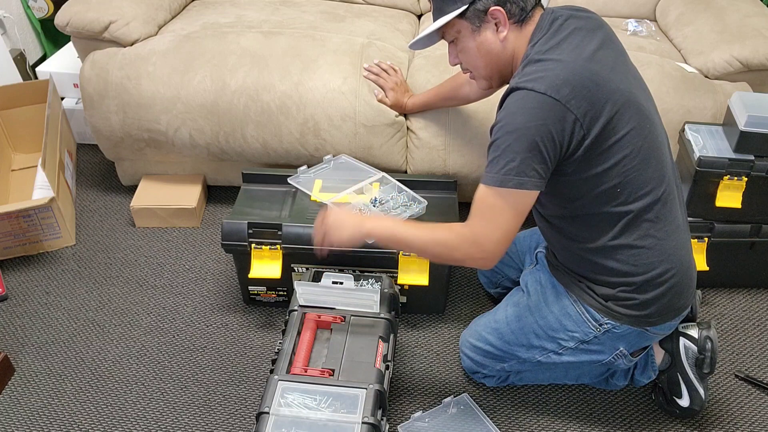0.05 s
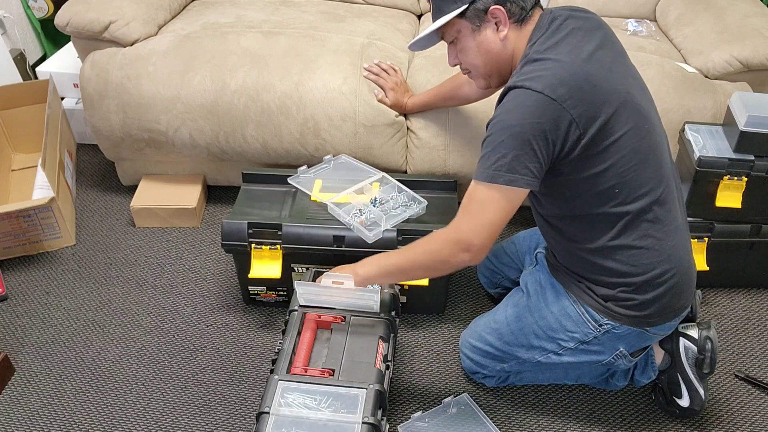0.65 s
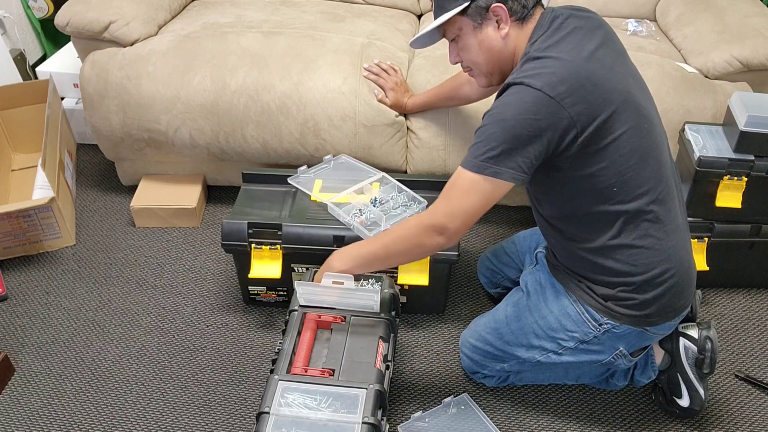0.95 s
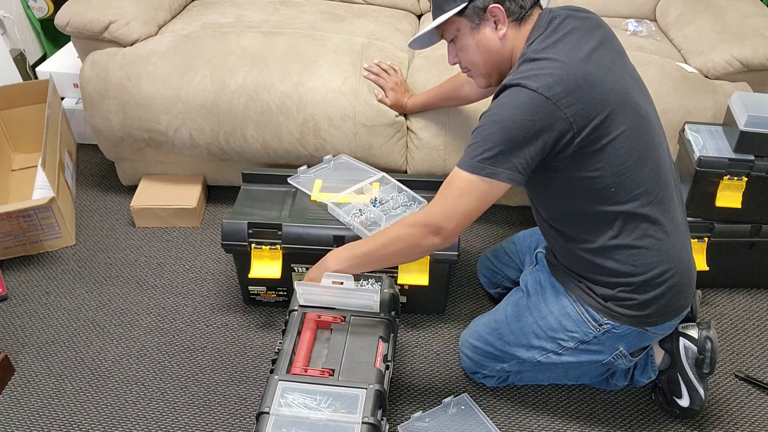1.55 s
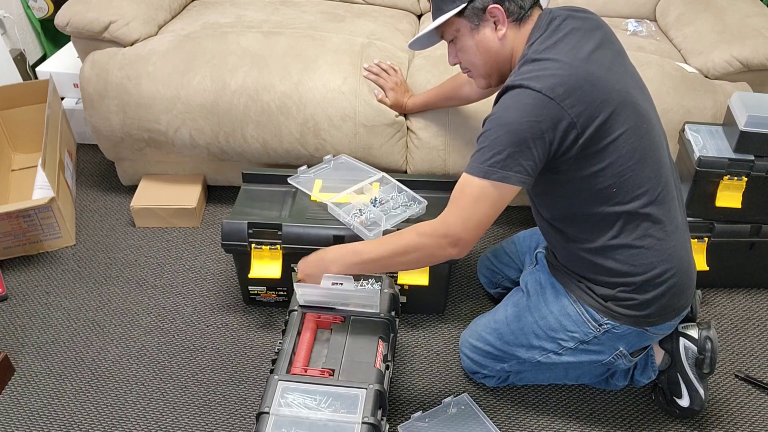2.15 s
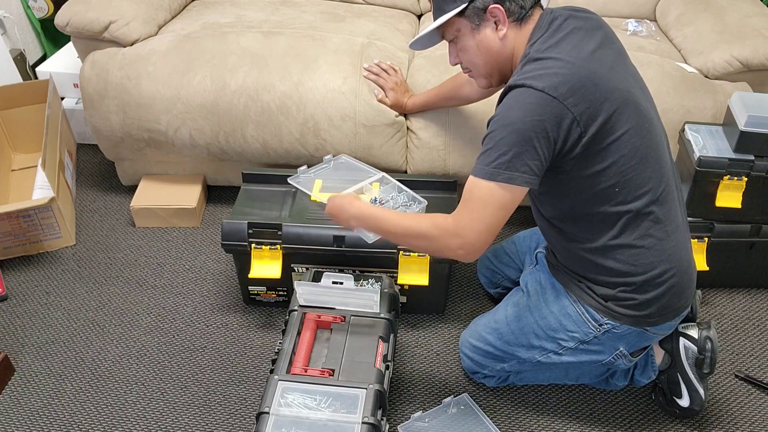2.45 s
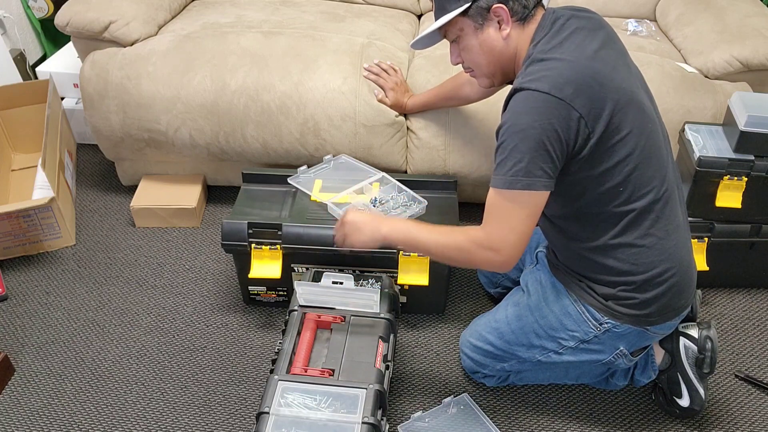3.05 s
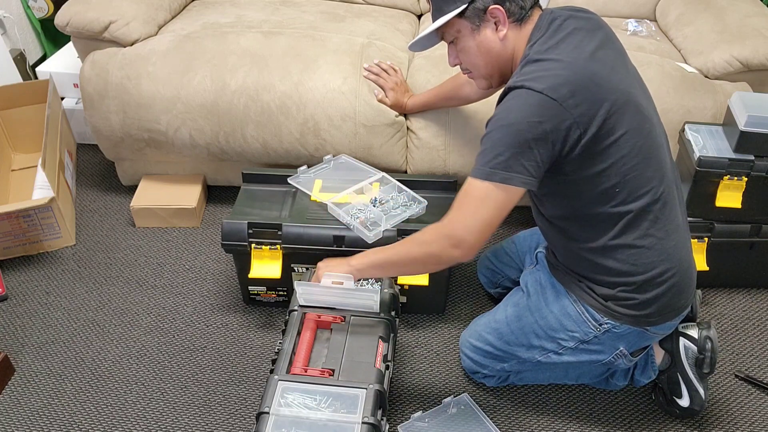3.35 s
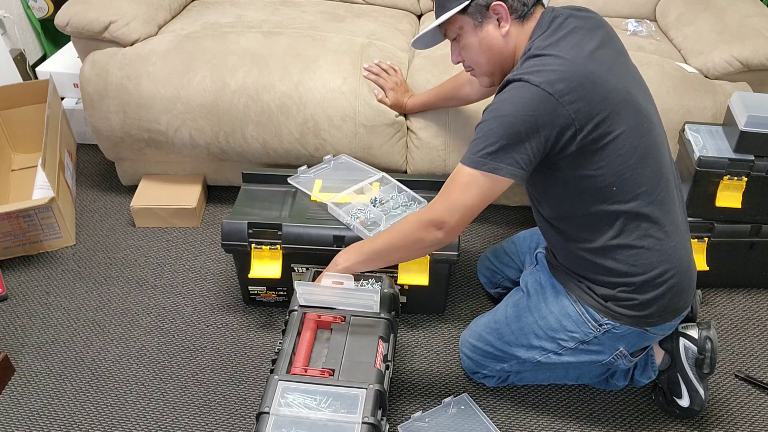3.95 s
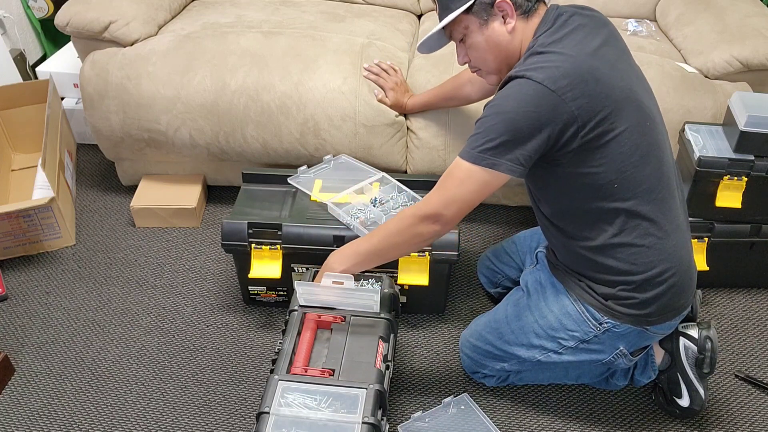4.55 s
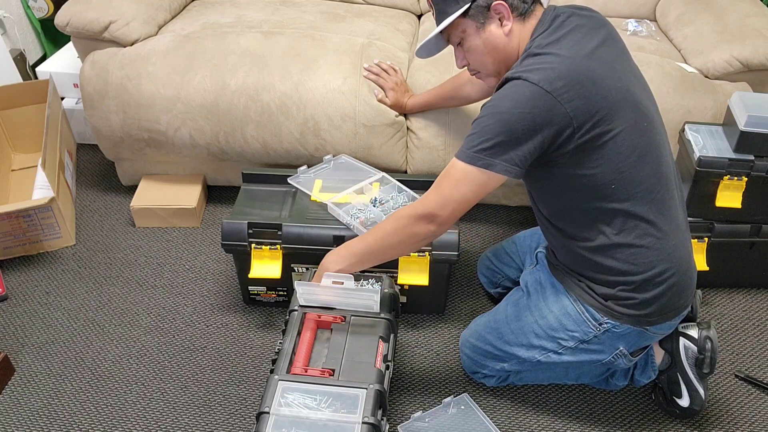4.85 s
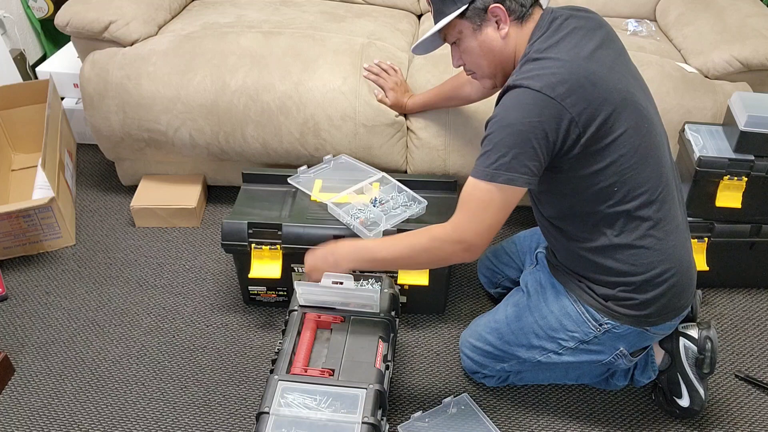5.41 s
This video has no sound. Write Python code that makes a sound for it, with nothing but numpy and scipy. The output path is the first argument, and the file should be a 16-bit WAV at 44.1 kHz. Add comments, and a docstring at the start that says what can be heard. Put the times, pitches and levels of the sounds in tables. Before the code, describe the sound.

A faint clink of screws in a hand opens over quiet room noise and a low hum. From about 0.5 seconds, fingers dig through small steel screws in a plastic bin: a dense, uneven rattle with sharp clicks and dull bumps against a toolbox, strongest around 0.8 and again from 1.7 to 2.1 seconds. After a short pause, at 2.7 seconds a handful pours into a plastic organizer with a brighter jingle, thinning to a trickle, and the last screw rolls lightly to rest by 3.4 seconds. Digging resumes at 3.7 seconds with heavier, hollow plastic knocks until about 4.3, eases into lighter stirring, and ends with a cluster of clicks around 5.2 to 5.3 seconds. A few very soft, deep floor bumps come from someone shifting their weight. The room is carpeted and fairly dry, with very little echo.

```python
"""Scooping and pouring small screws

In a carpeted room, a hand scoops steel screws from a plastic bin on a toolbox, pours one handful
into a compartment organizer, then digs for the next. Every contact rings the plastic floor, the
walls and the screws themselves. A dense rattle fills the gaps between the louder knocks."""
import sys
import numpy as np
from scipy import signal
from scipy.fft import rfft, irfft
from scipy.io import wavfile
from scipy.ndimage import uniform_filter1d, minimum_filter1d

SR = 44100
rng = np.random.default_rng(int(sys.argv[2]) if len(sys.argv) > 2 else 0)


def persist_wave(psi):
    """Save psi, clipped to +-1, as 16-bit WAV."""
    counts = np.round(np.clip(psi, -1, 1) * 32767).astype(np.int16)
    wavfile.write(sys.argv[1], SR, np.atleast_2d(counts).T)


N = 246078
RING_SAMPLES, ATTACK_SAMPLES, BOUNCE_SAMPLES = 1300, 220, 160

# spectrum of the room's noise: f/Hz, relative level/dB
ROOM_NOISE = [(25, -7), (45, 0), (110, -4.5), (200, -15.5), (450, -28.5), (800, -15.5), (1500, -22),
              (2500, -39), (6000, -39.5), (15000, -48.5)]
# mains hum and a thin whine: f/Hz, rms level/dB
HUM_TONES = [(59.2, -58.5), (118, -68), (4000, -82), (4802, -85.5)]
# the floor answers as a kneeling body shifts its weight: t/s, level/dB
BODY_SHIFTS = [(0.21, -50.5), (0.35, -53.5), (1.15, -49.5), (2.57, -54), (3.061, -48), (3.52, -51.5)]

# Modes are the tones an object rings with; t60 is the time they take to fade by 60 dB.
# toolbox shell, plastic bin and plastic organizer: f/Hz, relative level/dB, t60/s
TOOLBOX_MODES = [(175, -22.5, 0.026), (280, 0.5, .05), (322, 5, 0.065), (455, 2.5, 0.048)]
BIN_MODES = [(694.6, -5, 0.041), (811, 2.5, 0.022), (885, 0, 0.033), (1053, -5.5, 0.008),
             (1261, 3.5, 0.015), (1381, 4, 0.03), (2047, -3.5, 0.025), (2401, -2.5, 0.021)]
ORGANIZER_MODES = [(648, -14.5, 0.2), (717, -2, 0.031), (1010, -1, 0.011), (1430, 1, 0.026),
                   (1780, -4.5, 0.014), (1820, 3, 0.012), (2466, 4, 0.0087)]
# modes of the screws: f/Hz, relative level/dB
SCREW_MODES = [(2950, 3.5), (3550, 0), (4150, -0.5), (4850, -8.5), (5700, -11), (6700, -14), (8200, -6.5)]
# pressing down stiffens the plastic floor and raises its pitch: t/s, pitch factor
FLOOR_STIFFENING = [(2.1, 1.054), (3.1, 1.005), (3.9, 1.131), (4.1, 1.011)]

# the hand pushes a container against the toolbox: t/s, relative level/dB
PUSHES = [(0.726, -38), (0.838, -32), (1.139, -47), (1.423, -45), (1.96, -42), (2.07, -46), (2.85, -46.5),
          (3.643, -39.5), (3.745, -35), (3.896, -33.5), (4.04, -28), (4.136, -40.5), (4.321, -44),
          (4.45, -51)]
# one loose screw keeps ringing: t/s, level/dB
LOOSE_SCREW = [(1.87, -86.5), (1.9, -67), (1.965, -71), (1.98, -60), (2.08, -67), (2.13, -88.5)]
# the last screw rolls to rest: t/s, relative level/dB
LAST_ROLL = [(3.14, -41), (3.21, -54.5), (3.245, -40.5), (3.27, -62.5), (3.29, -46), (3.35, -61.5),
             (3.5, -73.5)]

# Heaviness turns up the plastic floor, and brightness the steel, compared with the plastic walls.
# hand strokes: t/s, hold/s, relative level/dB, heaviness/dB, brightness/dB
DIG_STROKES = [(0.48, 0.0022, -36.5, -8, -33), (0.657, .02, -18.5, -3, -8.5), (0.685, .058, -9.5, -3, -9.5),
               (0.783, 0.017, -19, -13, -3.5), (0.824, 0.034, -9.5, -4, -6), (0.931, .03, -23, -2.5, -6.5),
               (1.058, 0.04, -30, -1, -3.5), (1.14, 0.0041, -14.5, -1.5, -4.5),
               (1.18, 0.0043, -18.5, 2.5, -3.5), (1.226, 0.046, -25, -3, -0.5), (1.334, .015, -32, -3, -12),
               (1.368, 0.0093, -18, -6.5, -3.5), (1.437, 0.019, -28.5, -3, -6.5),
               (1.462, 0.029, -27.5, 2.5, -1), (1.527, 0.0094, -22.5, -0.5, -1.5),
               (1.634, 0.023, -28, -5.5, -1), (1.683, 0.13, -19, 0.5, -2.5), (1.861, 0.14, -19, 4, -5),
               (2.04, 0.043, -23, -2.5, -7), (2.237, .003, -46.5, 9, 5), (3.66, 0.016, -36, 5, -15),
               (3.701, 0.019, -28, 2.5, -12), (3.749, 0.014, -10.5, 9.5, -7), (3.802, 0.016, -27, 1, -6),
               (3.896, 0.023, -9, 7.5, -5), (4.022, 0.04, -10.5, 0, -5), (4.136, 0.018, -18.5, -6, -6.5),
               (4.199, 0.087, -22, -4, -6), (4.311, 0.029, -13.5, -2, -8), (4.373, .04, -26.5, 0.5, -11.5),
               (4.443, 0.015, -19.5, -1.5, -5.5), (4.504, 0.0053, -23.5, -9, -7),
               (4.582, 0.033, -28.5, -2.5, -8), (4.714, 0.038, -20.5, -10, -5.5),
               (4.798, 0.017, -27.5, -11, -2.5), (4.86, .04, -44, 3.5, -1.5),
               (4.923, 0.045, -23.5, -13, -5.5), (5.062, 0.028, -23.5, -16, -6.5),
               (5.135, 0.079, -33, -17, -12), (5.209, 0.02, -15, -12.5, -8), (5.284, 0.016, -18, -6, -7)]   # deep digging is heavy, light stirring is bright
POUR_STROKES = [(0.014, 0.042, -55, 8.5, 23), (2.683, 0.023, -22, -6.5, 3.5), (2.764, 0.017, -21, -12, 2),
                (2.843, 0.049, -20.5, -14.5, -0.5), (2.937, 0.057, -18.5, -9, -3.5),
                (3.001, 0.024, -23, -9, -4.5), (3.065, 0.02, -23.5, -10, -1.5)]   # screws jingle in the fist, pour out, then trickle
# loudest knocks of screws and fingers in the bin: t/s, relative level/dB, heaviness/dB
DIG_KNOCKS = [(0.461, -19.5, -20), (0.477, -24, -10), (0.697, -12.5, 4), (0.704, -10, -25),
              (0.716, -15, -7), (0.737, -11.5, 2), (0.782, -5, 1), (0.811, -9, 4), (0.829, -6, 7.5),
              (0.84, -11.5, 26), (0.874, -10, -18), (1.053, -22.5, -5), (1.14, -7, -7), (1.18, -10.5, -11),
              (1.375, -7, 4.5), (1.424, -8.5, 10), (1.624, -22, -4.5), (1.676, -8, -4), (1.691, -11.5, -8),
              (1.707, -12.5, -5), (1.742, -13.5, 8), (1.821, -8.5, 0), (1.858, -6.5, 1.5), (1.872, -9.5, 2),
              (1.889, -4.5, 6), (1.906, -8.5, -4), (1.96, -6.5, 8.5), (1.975, -7.5, -8), (2.047, -6, 8),
              (2.058, -15.5, -3), (2.08, -12, 10), (2.226, -24, 10), (3.688, -14, 1.5), (3.753, -14.5, 2),
              (3.771, -8.5, 13), (3.797, -11, 12), (3.815, -11.5, 3.5), (3.886, -7, 22), (3.901, -9.5, 9),
              (4.012, -8, 15), (4.032, -9, 1), (4.137, -8.5, 6), (4.159, -14.5, -7), (4.312, -6.5, 6.5),
              (4.334, -5.5, 0.5), (4.353, -16.5, -5), (4.463, -12, 5), (4.518, -18, -7),
              (4.76, -13.5, -2.5), (4.825, -18.5, -12.5), (4.992, -11.5, -19.5), (5.131, -19, -12.5),
              (5.148, -18.5, -13.5), (5.201, -24, -9.5), (5.217, -10.5, -8.5), (5.241, -11, -5.5),
              (5.274, -9, -5.5), (5.294, -11, -15.5), (5.313, -10.5, -9)]
# screws clink in the hand, then drop singly into the organizer: t/s, relative level/dB
HANDFUL_HITS = [(0.018, -39), (0.039, -41), (0.057, -33.5), (0.073, -41), (2.68, -18.5), (2.687, -11),
                (2.703, -15), (2.732, -13), (2.757, -12), (2.777, -10), (2.785, -9.5), (2.822, -11.5),
                (2.839, -11.5), (2.853, -13), (2.864, -18), (2.886, -24.5), (2.908, -12), (2.932, -11),
                (2.966, -11), (3.014, -18), (3.058, -19), (3.115, -17.5)]


def from_db(db):
    """Turn decibels into a gain."""
    return 10 ** (np.asarray(db) / 20)


def unit(x):
    """Scale a signal to an average (rms) size of 1."""
    return x / np.sqrt(np.mean(x ** 2) + 1e-20)


def butter(x, hz, kind, order=2):
    """Keep the lows, the highs or one band with a Butterworth filter."""
    return signal.sosfilt(signal.butter(order, hz, kind, fs=SR, output="sos"), x + 1e-18)


def gain_curve(rows):
    """A gain that follows rows of t/s, level/dB and is silent outside them."""
    s, db = np.transpose(rows)[:2]
    return from_db(np.interp(np.arange(N) / SR, s, db, left=-150, right=-150))


def lay_out(times, sounds):
    """Add up short sounds, each starting at its own time."""
    out = np.zeros(N + sounds.shape[1])
    for start, sound in zip(np.clip(times * SR, 0, N - 1).astype(int), sounds):
        out[start:start + len(sound)] += sound
    return out[:N]


def background(noise_db=-60):
    """Quiet room noise, mains hum and a thin whine."""
    hz, db = np.transpose(ROOM_NOISE)
    freqs = np.maximum(np.arange(N // 2 + 1) * SR / N, 1)
    spectrum = from_db(np.interp(np.log(freqs), np.log(hz), db))
    air = irfft(rfft(rng.standard_normal(N)) * spectrum, N)
    t = np.arange(N) / SR
    hum = sum(np.sqrt(2) * from_db(level) * np.sin(2 * np.pi * f * t) for f, level in HUM_TONES)
    return from_db(noise_db) * unit(air) + hum


def floor_bumps(width_s=0.035):
    """Shifting weight sends soft, deep swells through the carpet."""
    t = np.arange(N) / SR
    swell = sum(from_db(db) * np.exp(-((t - s) / width_s) ** 2) for s, db in BODY_SHIFTS)
    return swell * unit(butter(rng.standard_normal(N), [42, 115], "band", order=3))


def in_room(sound, split_hz=2200, first_echo_s=0.0059, top_hz=7080):
    """Add the short echoes that carpet and sofa leave, highs dying first, then cut the top treble."""
    t = np.arange(SR // 4) / SR
    echoes = rng.standard_normal(len(t)) * np.clip(t / first_echo_s - 0.5, 0, 1)
    response = 0
    for kind, db, t60 in (("low", -6, 0.12), ("high", -8, 0.069)):
        tail = echoes * np.exp(-np.log(1000) * t / t60)
        response += from_db(db) * butter(tail / np.linalg.norm(tail), split_hz, kind, order=3)
    reflections = signal.fftconvolve(sound, response)[:N]
    return butter(sound + reflections, top_hz, "low", order=12)


def overload_hiss(sound, gain_db, smooth_s=0.007, growth=1.3):
    """The overloaded recorder adds a fine, high fizz on the loudest clashes."""
    keep = np.exp(-1 / (smooth_s * SR))
    clash_power = signal.lfilter([1 - keep], [1, -keep], butter(sound, 2200, "high") ** 2)
    strength = np.minimum(clash_power / 0.02, 1.3) ** growth
    hiss = unit(butter(rng.standard_normal(N), [7500, 11500], "band", order=1))
    return from_db(gain_db) * strength * butter(hiss, 6000, "high")


def toolbox_thuds(push_s=0.01):
    """A pushed container judders on the toolbox, whose shell answers with a low thud."""
    s, db = np.transpose(PUSHES)
    t = np.arange(SR // 8) / SR
    shell = sum(from_db(level) * np.sin(2 * np.pi * hz * t) * np.exp(-np.log(1000) * t / t60)
                for hz, level, t60 in TOOLBOX_MODES)
    judder = rng.standard_normal((len(s), len(t))) * t * np.exp(-t / push_s)
    thuds = butter(signal.fftconvolve(judder, shell[None], axes=1), 200, "high", order=4)
    gains = from_db(db) / thuds[:, :RING_SAMPLES].std(axis=1)
    return lay_out(s, thuds * gains[:, None])


def screw_ring(hz=11130, half_width_hz=70):
    """One jostled screw gives a thin, high ring."""
    ring = butter(rng.standard_normal(N), [hz - half_width_hz, hz + half_width_hz], "band")
    return gain_curve(LOOSE_SCREW) * unit(ring)


def rolling_screw(ticks_per_s=900, thread_db=-19):
    """A screw's thread ticks lightly along the plastic."""
    ticks = rng.standard_normal(N) * (rng.random(N) < ticks_per_s / SR)
    plastic = unit(butter(ticks, [1420, 1820], "band", order=3))
    thread = unit(butter(ticks, [2700, 4200], "band", order=3))
    return gain_curve(LAST_ROLL) * (plastic + from_db(thread_db) * thread)


def effort(strokes, rise_db_per_s, settle_db_per_s=451):
    """Gain of the moving heap: each stroke rises, holds, then settles when the fingers stop."""
    t = np.arange(N) / SR
    db = np.full(N, -150.0)   # silence
    for s, hold, level, _, _ in strokes:
        before_db = rise_db_per_s * np.maximum(s - t, 0)
        after_db = settle_db_per_s * np.maximum(t - s - hold, 0)
        db = np.maximum(db, level - before_db - after_db)
    return from_db(db)


def stroke_tone(strokes, times):
    """Heaviness and brightness of the stroke nearest to each moment."""
    s, hold, _, heavy, bright = np.transpose(strokes)
    nearest = np.argmin(np.abs(times[:, None] - s - hold / 2) - hold / 2, axis=1)
    return heavy[nearest], bright[nearest]


def bounce(rings, fade_s, bounces):
    """A screw never lands just once: head, tip and neighbours touch within a few milliseconds."""
    t = np.arange(BOUNCE_SAMPLES) / SR
    shape = (len(rings), BOUNCE_SAMPLES)
    touches = rng.standard_normal(shape) * (rng.random(shape) < bounces / BOUNCE_SAMPLES)
    touches *= np.exp(-t / fade_s)
    touches[:, 0] = 0.46   # the first landing
    return signal.fftconvolve(rings, touches, axes=1)[:, :RING_SAMPLES]


def contacts(times, plastic_modes, heavy_db, bright_db, mode_spread_db=3, soft_below_db=-10):
    """One short ring of plastic and steel per contact; each lands elsewhere and mixes the modes anew."""
    count, t = len(times), np.arange(RING_SAMPLES) / SR
    modes = plastic_modes + [(hz, db, 0.008) for hz, db in SCREW_MODES]   # the heap damps screws fast
    chance = rng.standard_normal((count, len(modes), 3, 1))   # varies pitch, level and sign
    parts = np.zeros((3, count, RING_SAMPLES))
    dull_db = np.minimum(bright_db - soft_below_db, 0)[:, None]
    stiffening = np.interp(times, *np.transpose(FLOOR_STIFFENING))[:, None]
    for k, (hz, db, t60) in enumerate(modes):
        part = int(hz > 1150) + int(hz > 2650)   # 0 floor, 1 walls, 2 steel
        detune = 0.077 if hz > 1600 else 0.037
        pitch = hz * (1 + detune * chance[:, k, 0]) * (stiffening if part == 0 else 1)
        missed_db = dull_db * (hz > 1800)   # soft touches miss the high modes
        strength = from_db(db + missed_db + mode_spread_db * chance[:, k, 1]) * np.sign(chance[:, k, 2])
        parts[part] += strength * np.sin(2 * np.pi * pitch * t) * np.exp(-np.log(1000) * t / t60)
    parts *= 1 - np.exp(-t / (1e-5 - 6e-5 * dull_db))   # a soft touch also builds up slowly
    # small parts give off little sound below their lowest mode
    floor = butter(butter(parts[0], 970, "high"), 1200, "low", order=3)
    walls = butter(bounce(parts[1], fade_s=0.0012, bounces=4), [1050, 2600], "band", order=3)
    steel = butter(bounce(parts[2], fade_s=0.0055, bounces=19), 3000, "high", order=3)
    shares = from_db([heavy_db, np.zeros(count), bright_db])
    shares /= np.linalg.norm(shares, axis=0)   # every ring starts about equally strong
    return sum(ring * (share / ring[:, :ATTACK_SAMPLES].std(axis=1))[:, None]
               for ring, share in zip((floor, walls, steel), shares))


def rattle(strokes, modes, per_s, rise_db_per_s, size_spread_db, gain_db, heavy_db, bright_db):
    """Screws slide over each other in many small contacts; the hand's effort sets the level."""
    count = int(N / SR * per_s)
    times = (np.arange(count) + rng.uniform(-1, 1, count)) / per_s
    since_stroke_s = times[:, None] - np.transpose(strokes)[0]
    near_stroke = ((since_stroke_s > -0.05) & (since_stroke_s < 0.22)).any(axis=1)
    times = times[near_stroke]
    heavy, bright = stroke_tone(strokes, times)
    rings = contacts(times, modes, heavy + heavy_db, bright + bright_db)
    sizes = from_db(size_spread_db * rng.standard_normal((len(times), 1)))
    clatter = lay_out(times, rings * sizes)
    power = uniform_filter1d(clatter ** 2, size=900)
    even_clatter = clatter / np.sqrt(np.abs(power) + 1e-4)
    return even_clatter * effort(strokes, rise_db_per_s) * from_db(gain_db)


def knocks(rows, strokes, modes, gain_db, heavy_db, bright_db):
    """Single clear hits take the tone of their stroke, unless a row has its own heaviness."""
    s, db, *own_heavy = np.transpose(rows)
    heavy, bright = stroke_tone(strokes, s)
    heavy = own_heavy[0] if own_heavy else heavy
    rings = contacts(s, modes, heavy + heavy_db, bright + bright_db)
    return lay_out(s, rings * from_db(db + gain_db)[:, None])


def digging():
    """Fingers stir the heap: screws knock and rattle in the bin, which bumps the toolbox."""
    hits = knocks(DIG_KNOCKS, DIG_STROKES, BIN_MODES, gain_db=-1.5, heavy_db=-1.5, bright_db=2)
    thuds = toolbox_thuds()
    heap = rattle(DIG_STROKES, BIN_MODES, per_s=340, rise_db_per_s=900, size_spread_db=5,
                  gain_db=-2.5, heavy_db=-1, bright_db=2)
    return hits + thuds + heap


def pouring():
    """Screws clink in the hand; later a handful falls into the organizer and the last rolls to rest."""
    hits = knocks(HANDFUL_HITS, POUR_STROKES, ORGANIZER_MODES, gain_db=1, heavy_db=-8, bright_db=-1)
    roll = rolling_screw()
    stream = rattle(POUR_STROKES, ORGANIZER_MODES, per_s=330, rise_db_per_s=3999, size_spread_db=3.5,
                    gain_db=-1, heavy_db=0.5, bright_db=1)
    return hits + roll + stream


def scene():
    """Scoop, pour and scoop again in a quiet room, in mono."""
    dig = in_room(digging())
    pour = in_room(pouring())
    treble = overload_hiss(dig, gain_db=-54) + overload_hiss(pour, gain_db=-49.5) + screw_ring()
    return (dig + pour + treble + background() + floor_bumps())[None]


def record(dry, ceiling=1.0, cutoff_hz=15400):
    """A fast limiter holds down the peaks, then a steep filter cuts the highest treble."""
    allowed_gain = np.minimum(1, ceiling / (np.abs(dry) + 1e-9))
    limited = dry * uniform_filter1d(minimum_filter1d(allowed_gain, size=45), size=45)
    return signal.sosfilt(signal.ellip(10, 0.1, 80, cutoff_hz, fs=SR, output="sos"), limited)


dry = scene()
out = record(dry)
persist_wave(out)
```